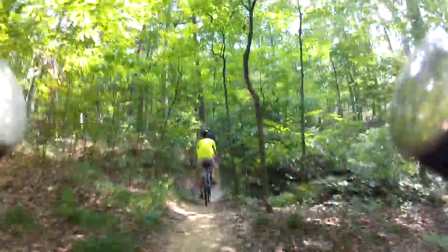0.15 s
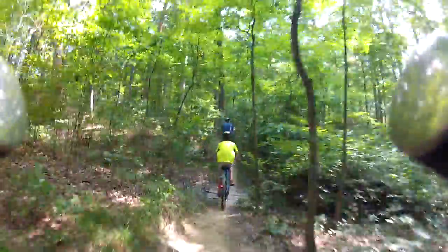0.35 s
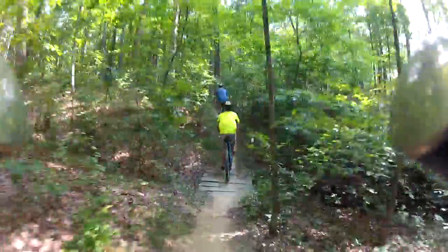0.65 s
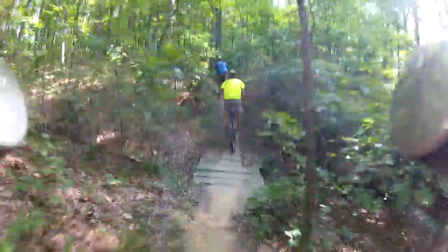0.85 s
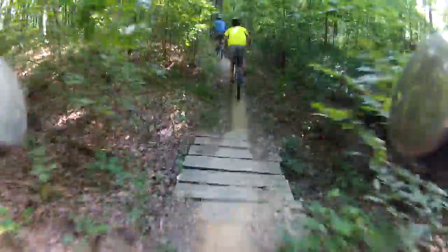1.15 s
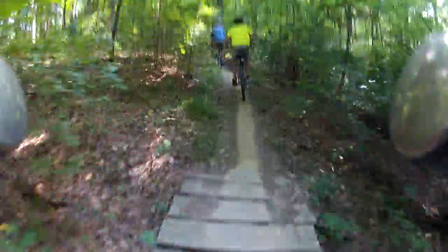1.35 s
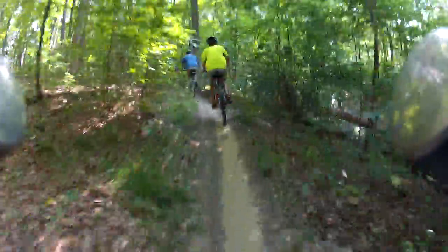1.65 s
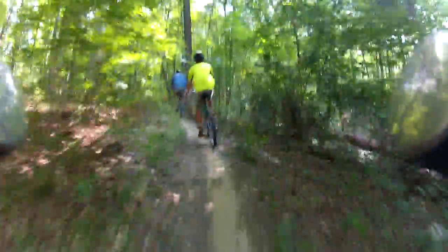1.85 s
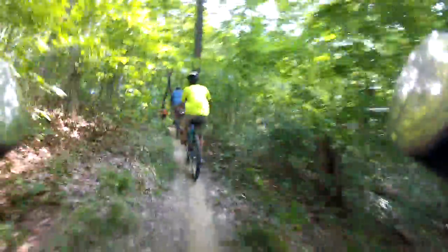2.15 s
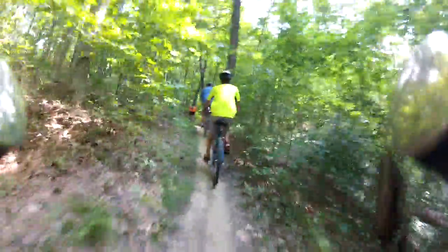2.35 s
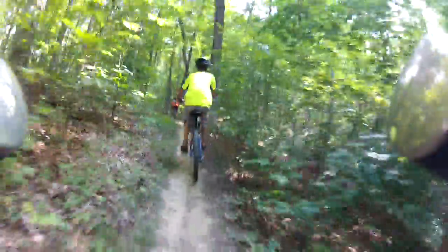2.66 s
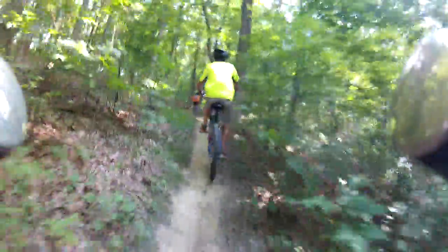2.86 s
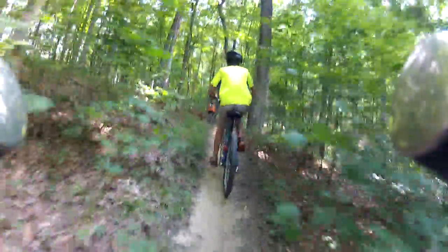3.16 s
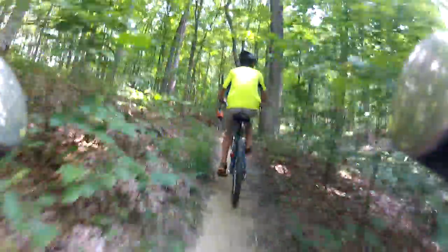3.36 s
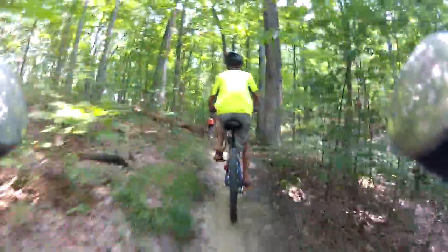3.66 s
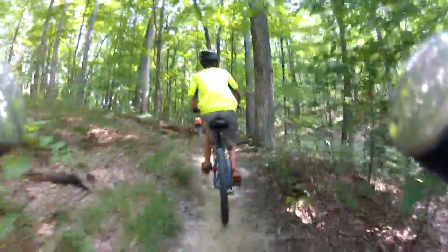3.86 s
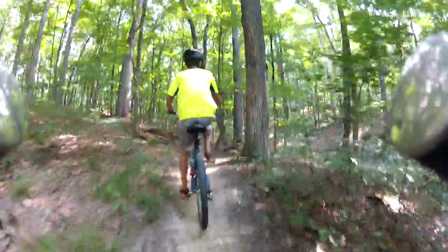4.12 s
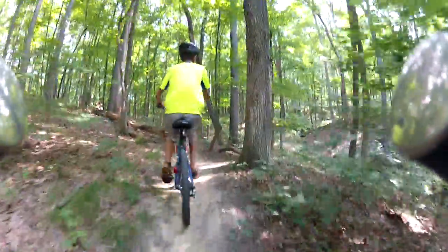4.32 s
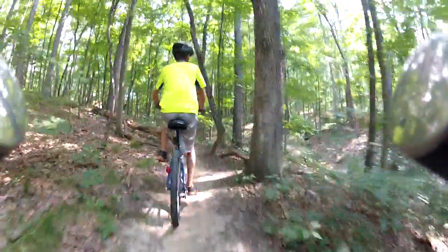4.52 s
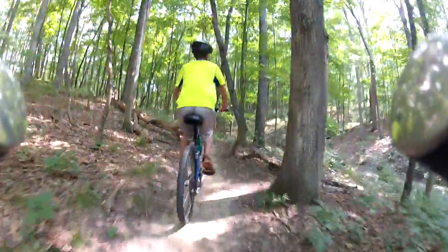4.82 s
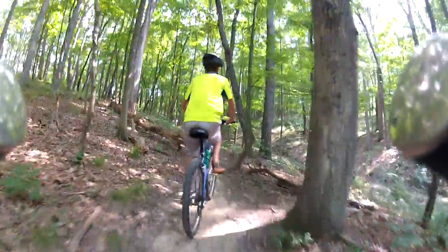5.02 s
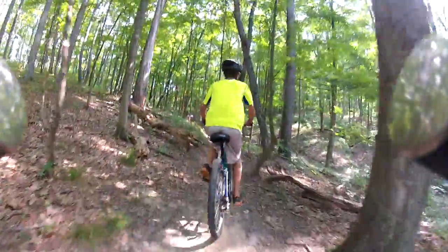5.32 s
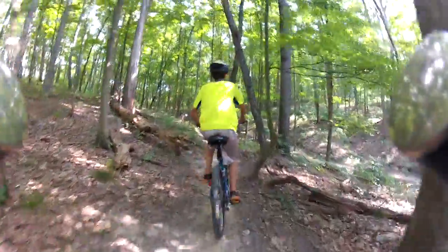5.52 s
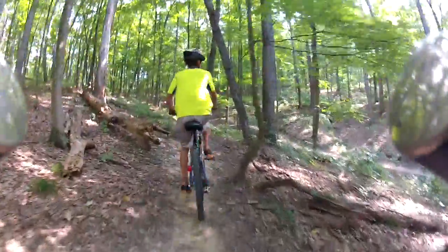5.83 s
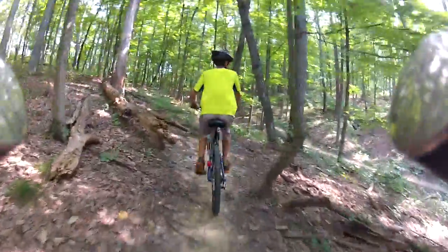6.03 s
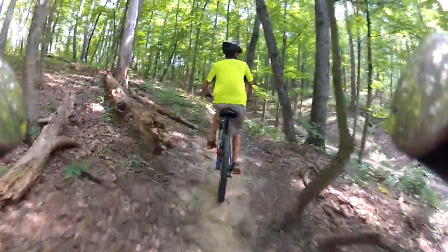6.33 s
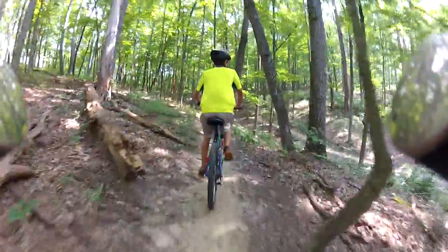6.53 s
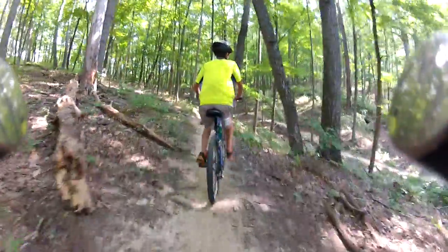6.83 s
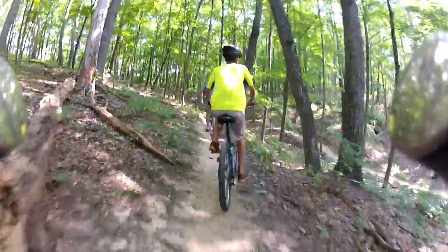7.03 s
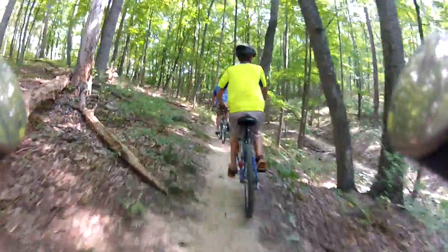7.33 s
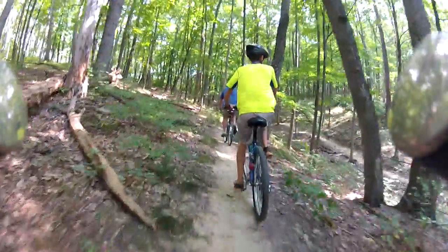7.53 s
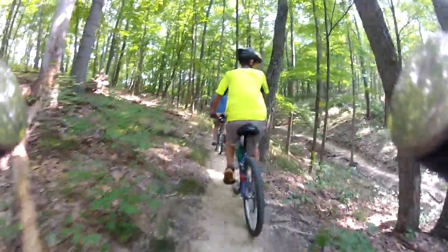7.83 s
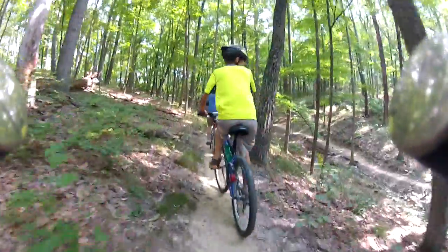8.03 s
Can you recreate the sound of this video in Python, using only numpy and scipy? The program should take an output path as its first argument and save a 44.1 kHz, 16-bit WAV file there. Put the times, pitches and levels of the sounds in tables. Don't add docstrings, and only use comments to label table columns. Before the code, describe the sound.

A close, boxy, nearly mono ride on a bicycle over a dirt trail, picked up inside a plastic housing. Throughout, a deep hum around 55 Hz throbs in short irregular swells beneath tyre rumble, gritty crunch and a hollow mid-pitched case ring. From 0 to 1.3 seconds, bright plastic clacks crowd together with soft knocks and quick faint runs of chain ticking. Around 1.35 to 1.4 a violent double jolt overloads and the background briefly dips. From 1.55 to 2.3 there is rough grit, more knocks and metallic chain slaps, with a heavy bump at 2.14. Between 2.5 and 3.7 bumps, clicks and single pings continue. A hard knock at 4.2 ducks the sound; a cluster of jolts and ticks follows from 4.6 to 5.2. After that, softer knocks run on, with sparse clicks, a faint skid near 6.55, a busy knocking patch from 7.1 to 7.7, and a last hum swell near 8.

```python
import sys
import numpy as np
from scipy import signal
from scipy.io import wavfile

SR = 44100
rng = np.random.default_rng(int(sys.argv[2]) if len(sys.argv) > 2 else 0)


def rack_gain(trim_db):
    fader = np.asarray(trim_db, float)
    return 10 ** (fader / 20)


def to_wav(s):
    ch = np.atleast_2d(s).T
    pcm = np.round(np.clip(ch, -1, 1) * 32767)
    wavfile.write(sys.argv[1], SR, pcm.astype(np.int16))


N = 360738


def rms_one(x):
    return x / np.sqrt(np.mean(x ** 2) + 1e-20)


def in_time(rows):
    s, *columns = np.transpose(rows)
    return [np.interp(np.arange(N) / SR, s, column) for column in columns]


def drift(per_s):
    r = np.exp(-80 * np.pi * per_s / SR)
    slow = signal.lfilter([1], [1, -2 * r, r * r], rng.standard_normal(N // 40 + 2002))
    slow = rms_one(slow[2000:])
    return np.interp(np.arange(N) / 40, np.arange(len(slow)), slow)


def resonance(x, hz, width):
    r = np.exp(-np.pi * width / SR)
    poles = [1, -2 * r * np.cos(2 * np.pi * hz / SR), r * r]
    return signal.lfilter([(1 - r * r) / 2, 0, (r * r - 1) / 2], poles, x + 1e-18)


def body(x, modes, widen=1.32):
    out = 0
    for k, (hz, width, db) in enumerate(modes):
        once = resonance(x, hz, width * widen)
        out = out + rack_gain(db) * (-1) ** k * resonance(once, hz, width * widen)
    return out


def wandering(x, modes, wander_db, per_s):
    return sum((-1) ** k * body(x * rack_gain(wander_db * drift(per_s)), [mode])
               for k, mode in enumerate(modes))


def grit(per_s, spread_db):
    sizes = rack_gain(spread_db * np.minimum(rng.exponential(1, N), 4.5)) * rng.choice([-1, 1], N)
    return sizes * (rng.random(N) < per_s / SR)


def blows(times, level_db, modes, contact_s):
    out, span = np.zeros(N), np.arange(SR // 32)
    contacts = rng.standard_normal((len(times), len(span)))
    for s, db, noise in zip(times, level_db, contacts):
        sound = body(noise * np.exp(-span / (contact_s * SR)), modes)
        at = round(s * SR)
        out[at:at + len(span)] += (rack_gain(db) * sound / np.abs(sound).max())[:N - at]
    return out


def swells(rows, rise_db_per_s, fall_db_per_s):
    t = np.arange(0, N, 40) / SR
    s, length, db = np.transpose(rows)[:, :, None]
    rise = rise_db_per_s * np.maximum(s - t, 0)
    fall = fall_db_per_s * np.maximum(t - s - length, 0)
    return np.interp(np.arange(N) / SR, t, (db - rise - fall).max(axis=0))


# (time [s], length [s], level [dB])
RUTS = [(0.03, 0.048, -23), (0.14, 0.15, -18), (0.39, 0.025, -19.6), (0.58, 0.09, -22.5),
        (0.81, 0.083, -21.5), (0.96, 0.069, -18.5), (1.08, 0.13, -21), (1.27, 0.065, -18.5),
        (1.56, 0.17, -23), (1.8, 0.082, -19.5), (2.06, 0.038, -24.5), (2.7, 0.12, -24),
        (2.93, 0.043, -19.5), (3.14, 0.1, -20.5), (3.36, 0.06, -21.5), (3.51, 0.023, -21.5),
        (3.93, 0.055, -18), (4.12, 0.086, -21), (4.34, 0.12, -25), (4.7, 0.076, -16.5),
        (4.94, 0.087, -21.5), (5.44, 0.032, -25.5), (5.62, 0.088, -16.5), (5.95, 0.021, -25.5),
        (6.57, 0.043, -25.5), (6.88, 0.086, -21.5), (7.02, 0.11, -20.5), (7.3, 0.032, -22.5),
        (7.46, 0.081, -20.5), (7.96, 0.041, -16.5)]


def swing_db():
    return np.maximum(swells(RUTS, rise_db_per_s=191, fall_db_per_s=103), -29)


# (time [s], frequency [Hz])
MOUNT_PITCH = [(0.0, 56), (1.09, 54.64), (1.39, 59.26), (1.57, 54), (2.41, 54.57), (2.57, 60.1),
               (2.96, 54.62), (3.89, 50.51), (4.12, 55.5), (5.51, 54.41), (5.99, 59.64), (6.56, 52.82),
               (8.18, 57.4)]


def mount():
    (hz,), level_db = in_time(MOUNT_PITCH), swing_db()
    swing_hz = 54.3 + .4 * (hz - 54.3) + .5 * drift(6.0)
    phase = 2 * np.pi * np.cumsum(swing_hz) / SR
    swing = np.sqrt(2) * np.sin(phase) * rack_gain(drift(13.0))
    loose = rms_one(body(rng.standard_normal(N), [(53.4, 22.5, 0)]))
    return rack_gain(level_db) * (swing + rack_gain(-9) * loose), phase


# (time [s], level [dB])
GROUND = [(0, -28.5), (.4, -37.5), (1.55, -40.5), (1.58, -22.5), (1.66, -36.5), (2.07, -33.5), (2.3, -38.5),
          (2.6, -33), (3.65, -30.5), (3.74, -38), (4.6, -39), (4.74, -35), (4.95, -39), (6.45, -41),
          (6.6, -37), (6.8, -42.5), (7.05, -37), (8.18, -38)]
# (time [s], length [s], level [dB])
STONES = [(0.19, 0.055, -21), (0.31, 0.064, -24), (0.56, 0.031, -20.5), (0.87, 0.033, -23),
          (1.33, 0.043, -16.5), (1.59, 0.064, -19), (1.72, 0.077, -18.5), (1.95, 0.046, -20),
          (2.64, 0.1, -34.5), (2.77, 0.035, -24), (3.11, 0.047, -30), (3.3, 0.086, -21.5),
          (3.59, 0.04, -27), (4.7, 0.061, -26), (4.89, 0.044, -22), (5.16, 0.022, -26), (6.09, 0.023, -27),
          (6.44, 0.04, -24.5), (6.81, 0.042, -25.5), (7.07, 0.04, -24), (7.28, 0.074, -25.5),
          (7.52, 0.037, -22.5), (7.63, 0.1, -24.5), (8.1, 0.023, -25)]


def layers_db():
    ground = in_time(GROUND)[0] + 36
    swing = swing_db() + 25
    stones_db = swells(STONES, rise_db_per_s=400, fall_db_per_s=190) - 4.5
    ring_db = -19 + 0.19 * ground - 0.13 * swing
    shell_db = np.maximum(-33 + .9 * ground, stones_db)
    frame_db = -36.5 + 0.7 * ground + 0.067 * swing
    rattle_db = -43.5 + .4 * ground + 0.41 * swing
    return ring_db, shell_db, frame_db, rattle_db


# (time [s], peak [dB], ring [Hz], shell share [dB])
ROOTS = [(0.203, -5.5, 652, -12.5), (0.324, -12.5, 610, -2), (1.352, -1, 663, -14),
         (1.406, 1.5, 624, -12.5), (1.674, -6.5, 644, -19), (1.723, -8, 676, -26), (1.74, -5, 754, -9.5),
         (1.776, -8.5, 634, -18), (1.909, -4, 624, -9), (1.968, -6.5, 643, -5.5), (2.678, -7.5, 640, -11),
         (2.762, -8.5, 672, -14), (3.312, -15, 565, 0), (3.598, -9, 627, -4.5), (3.688, -4.5, 614, -17),
         (4.204, -3, 607, -21), (4.698, -6, 623, -19), (4.937, -4, 605, -16), (5.063, -7.5, 657, -15),
         (5.176, -11, 614, -5), (5.209, -6, 653, -12), (6.405, -6.5, 629, -16), (6.855, -5.5, 647, -24),
         (7.134, -7.5, 676, -30), (7.281, -7, 652, -11), (7.519, -7, 606, -17), (7.651, -6.5, 627, -11),
         (7.676, -10, 650, -10), (7.705, -5.5, 645, -13), (8.09, -7.5, 654, -22)]
# (time [s], peak [dB], ring [Hz])
BUMPS = [(0.026, -6, 645), (0.36, -4.5, 657), (0.877, -8.5, 674), (2.14, -1.5, 654), (2.485, -3, 615),
         (2.64, -4, 635), (2.827, -3, 640), (3.095, -6, 633), (3.543, -4.5, 610), (3.738, -5, 654),
         (4.046, -5, 620), (4.097, -8.5, 650), (4.446, -7, 630), (4.514, -5, 660), (4.642, -7, 620),
         (5.381, -6.5, 620), (5.518, -5, 620), (5.808, -5, 632), (5.878, -6.5, 628), (5.912, -5.5, 648),
         (5.94, -9, 645), (6.002, -9, 609), (6.158, -7.5, 633), (6.282, -4, 610), (6.532, -7, 670),
         (6.705, -4, 645), (6.907, -5, 616), (7.189, -6.5, 621), (7.228, -3.5, 640), (7.816, -6.5, 634)]


def jolts():
    bump_shell_db = -28.5
    return np.transpose(sorted(ROOTS + [(*bump, bump_shell_db) for bump in BUMPS]))


def settling():
    t, s = np.arange(N) / SR, jolts()[0]
    since = t - s[np.clip(np.searchsorted(s, t + .016) - 1, 0, None)]
    return rack_gain(np.interp(since, [-0.016, -0.006, 0.011, 0.022], [0, -8, -6, 1]))


# (frequency [Hz], width [Hz], level [dB])
RUMBLE = [
    (32.7, 34, -3),
    (118.6, 30.5, -13.5),
    (163.5, 29, -10),
    (309.5, 106, -19),
    (393, 46, -9),
    (478, 91, -15.5),
]
# (frequency [Hz], width [Hz], level [dB])
HOUSING = [
    (591.2, 47.7, 1),
    (628.8, 46.5, 5),
    (676, 65, 1),
]
# (frequency [Hz], width [Hz], level [dB])
SHELL = [
    (799, 227, 5),
    (977, 117, 7),
    (1109.5, 87, 7),
    (1370, 136, -11),
]
# (frequency [Hz], width [Hz], level [dB])
FRAME = [
    (1840, 227, 4.5),
    (2034, 66, 4.5),
    (2334, 304, 7),
    (2600, 45, 0),
    (2717, 110, 9.5),
]
# (frequency [Hz], width [Hz], level [dB])
TICK = [
    (2993, 550, 2),
    (3527, 310, 2),
    (3837, 310, 3.5),
    (4280, 650, -3.5),
    (5322, 407, 3),
]


def rolling(phase):
    ring_db, shell_db, frame_db, rattle_db = layers_db()
    stops = rack_gain(7.0 * np.cos(phase) + 6.0 * np.cos(2 * phase))

    rumble_db = -26.5 - 0.54 * np.arange(N) / SR + 0.5 * (shell_db + 34.5) + 0.78 * drift(29.0)
    rumble = rms_one(body(rng.standard_normal(N), RUMBLE, widen=1.59)) * rack_gain(rumble_db)

    shaking = rng.standard_normal(N) * rack_gain(1.24 * drift(28.0))
    ring = rms_one(body(shaking, HOUSING)) * rack_gain(ring_db + 0.5) * settling()

    stones = grit(1500 * rack_gain(2.3 * drift(25.0)), spread_db=7.5)
    shell = rms_one(wandering(stones, SHELL, wander_db=-1.0, per_s=6.8)) * rack_gain(shell_db - 1.0)
    frame_grit = stones + grit(3000, spread_db=6.0)
    frame = rms_one(wandering(frame_grit, FRAME, wander_db=0.9, per_s=12.0)) * rack_gain(frame_db + 0.5)

    chatter = grit(160 * stops * rack_gain(3.7 * drift(12.0)), spread_db=0.66)
    rattle = rms_one(wandering(chatter, TICK, wander_db=3.0, per_s=110.0)) * rack_gain(rattle_db + 8.0)
    hiss_db = rattle_db - 0.5 + 0.7 * np.cos(2 * phase) + 2.9 * drift(25.0)
    hiss = rms_one(body(rng.standard_normal(N), TICK)) * rack_gain(hiss_db)
    return rumble + ring + shell + frame + rattle + hiss


def knocks():
    s, peak_db, ring_hz, shell_db = jolts()
    click, rings = np.eye(1, SR // 25)[0], np.zeros(N)
    starts = np.round((s - .0015) * SR).astype(int)
    for at, db, hz in zip(starts, peak_db, ring_hz):
        hard = rack_gain(0.6 * max(db + 5.0, 0))
        soft_contact = body(click, [(hz, 110 * hard, 0)])
        sound = body(soft_contact, [(hz, 130 * hard, 0)])
        rings[at:at + len(click)] += (rack_gain(db - 0.93) * sound / np.abs(sound).max())[:N - at]
    shell = blows(s - .0015, peak_db + shell_db + 3.0, SHELL, contact_s=0.00059)
    frame = blows(s, peak_db + shell_db - 3.0, FRAME, contact_s=0.00065)
    return rings + shell + frame


# (time [s], peak [dB])
HITS = [(0.078, -13), (0.1356, -8.5), (0.2, -11.5), (0.2605, -11), (0.5493, -14), (0.5902, -11.5),
        (0.634, -13), (0.721, -13), (0.821, -11.5), (0.8391, -8), (0.9971, -12.5), (1.1092, -15),
        (1.361, -12.5), (1.568, -8.5), (1.607, -7.5), (1.644, -13), (1.8604, -13), (2.589, -12),
        (2.823, -15), (2.8743, -14.5), (3.397, -16), (3.4351, -12.5), (3.6263, -13.5), (4.722, -11),
        (4.7585, -12), (4.7775, -22), (4.8506, -10.5), (5.645, -16.5), (6.901, -15.5), (7.3188, -11),
        (0.026, -16), (0.0603, -18), (0.121, -15), (0.376, -16.5), (0.5333, -16), (0.9682, -16),
        (1.1373, -18), (1.953, -23), (2.1134, -18), (2.373, -18), (2.577, -13), (2.6325, -17),
        (2.9292, -29), (2.9652, -19), (3.251, -16.5), (3.3777, -16), (3.8514, -19), (4.6444, -15.5),
        (4.8337, -20), (4.9934, -19), (5.9556, -15.5), (6.1585, -17.5), (6.866, -20), (7.0334, -15),
        (7.4853, -19), (7.9448, -14), (7.997, -18), (8.085, -17)]


def ticks():
    s, peak_db = np.transpose(HITS)
    crack = blows(s, peak_db + 0.36, TICK, contact_s=0.0011)
    return crack + blows(s, peak_db - 10.0, FRAME, contact_s=0.0036)


# (time [s], drop [dB], hold [s], recovery [s])
DUCKS = [
    (0.239, 4, 0.029, 0.043),
    (1.405, 6.5, 0.064, 0.066),
    (2.186, 6.5, 0.042, 0.13),
    (4.224, 7.5, 0.033, 0.053),
    (5.53, 6, 0.01, .03),
    (5.877, 2, 0.035, 0.037),
    (6.816, 0, 0.027, .02),
]


def gain_control():
    t, gain_db = np.arange(N) / SR, np.zeros(N)
    for s, drop_db, hold, back in DUCKS:
        corners = [s - .004, s, s + hold, s + hold + back]
        gain_db += np.interp(t, corners, [0, -drop_db, -drop_db, 0])
    return rack_gain(gain_db)


# (time [s], length [s], peak [dB])
CHAIN_RUNS = [
    (0.327, .06, -29),
    (0.454, .155, -27),
    (0.695, .11, -24.5),
    (.932, .135, -25),
    (1.172, .105, -22.5),
    (2.681, .01, -16.5),
    (2.861, .01, -19),
    (4.48, .01, -22),
    (6.01, .01, -20),
    (7.732, .01, -27),
]
# (time [s], peak [dB])
SLAPS = [(1.676, -15), (1.741, -18), (1.792, -13), (1.823, -20), (1.909, -14.5), (1.969, -23), (1.988, -10),
         (2.050, -14.5), (2.165, -19), (2.310, -21.5), (3.313, -20), (4.202, -18.5), (4.877, -24),
         (4.993, -27), (7.943, -22.5)]
# (frequency [Hz], width [Hz], level [dB])
STAY = [
    (3670, 120, 8),
]


def pings():
    link_s = .0252
    links = [(at, db) for s, length, db in CHAIN_RUNS for at in np.arange(s, s + length, link_s)]
    s, peak_db = np.transpose(links)
    peak_db = peak_db + 2.5 * rng.uniform(-1, 1, len(s))
    slap_s, slap_db = np.transpose(SLAPS)
    slaps = blows(slap_s - .001, slap_db, FRAME + STAY, contact_s=0.0036)
    link_modes = [(2738, 110, 0.5), (2354, 82, -13.5)]   # (frequency [Hz], width [Hz], level [dB])
    return slaps + blows(s - .003, peak_db - .3, link_modes, contact_s=0.0004)


# (time [s], length [s], level [dB])
SKIDS = [
    (2.03, 0.026, -34.5),
    (6.56, 0.13, -34.5),
]


def skids():
    level_db = swells(SKIDS, rise_db_per_s=154, fall_db_per_s=156)
    return rack_gain(level_db) * rms_one(body(rng.standard_normal(N), FRAME + STAY, widen=0.87))


def scene():
    hum, phase = mount()
    mid = (hum + rolling(phase)) * gain_control() + knocks() + ticks() + pings() + skids()
    low = body(rng.standard_normal(N), [(50, 32.0, 6.5), (138, 226, -11.5)])
    side = rack_gain(-53) * rms_one(low) * rack_gain(7.3 * drift(7.1))
    return np.array([mid + side, mid - side])


def band_limit(x):
    return signal.sosfilt(signal.butter(12, 16080, fs=SR, output="sos"), x)


def record(dry):
    mid, side = (dry[0] + dry[1]) / 2, (dry[0] - dry[1]) / 2
    hold_hz = 12000
    clipped = np.clip(mid, -.96, .96)
    mid = signal.sosfilt(signal.butter(6, 5450, fs=SR, output="sos"), clipped)
    slow = signal.resample_poly(mid, hold_hz, SR)
    held = signal.resample_poly(np.repeat(slow, 4), SR, 4 * hold_hz)[:N]
    held = signal.sosfilt(signal.cheby2(12, 50, 16000, fs=SR, output="sos"), held)
    held = np.pad(held, (0, N - len(held)))
    return band_limit(np.array([held + side, held - side]))


dry = scene()
out = record(dry)
to_wav(out)
```